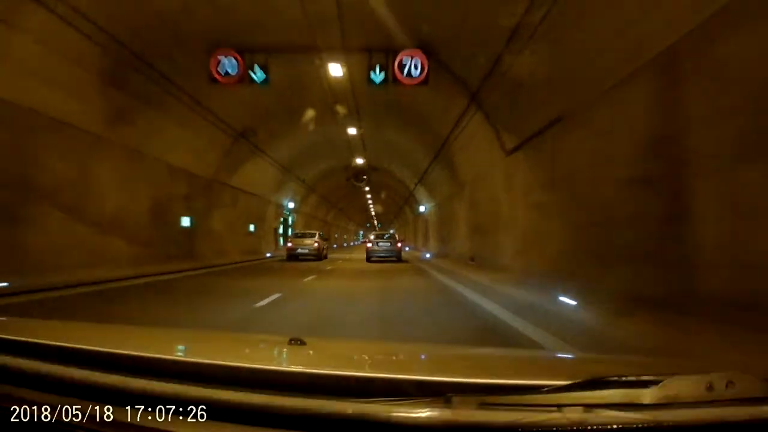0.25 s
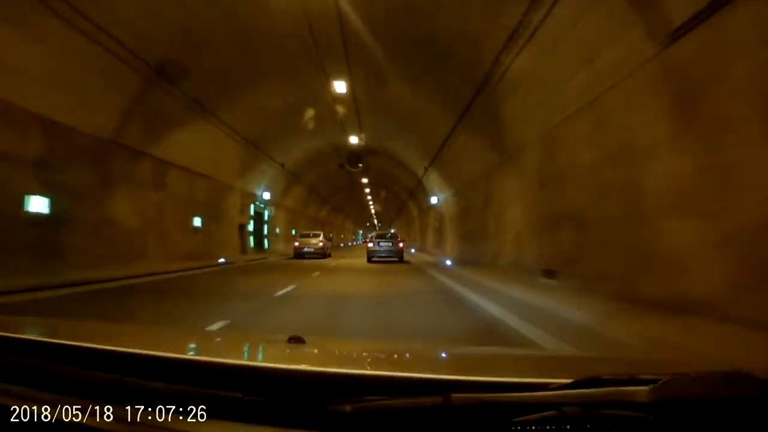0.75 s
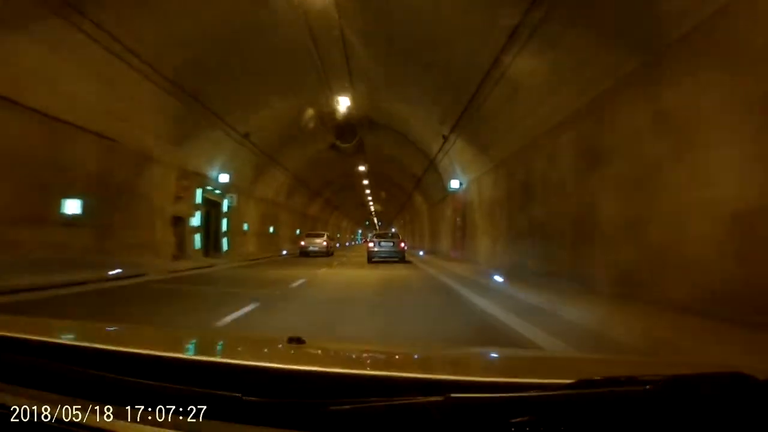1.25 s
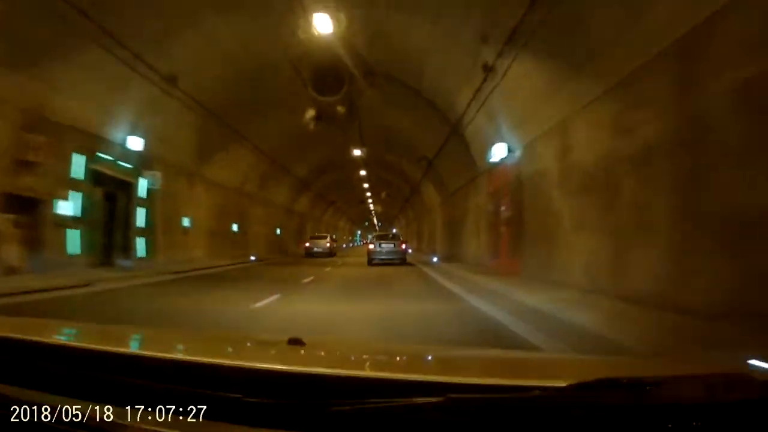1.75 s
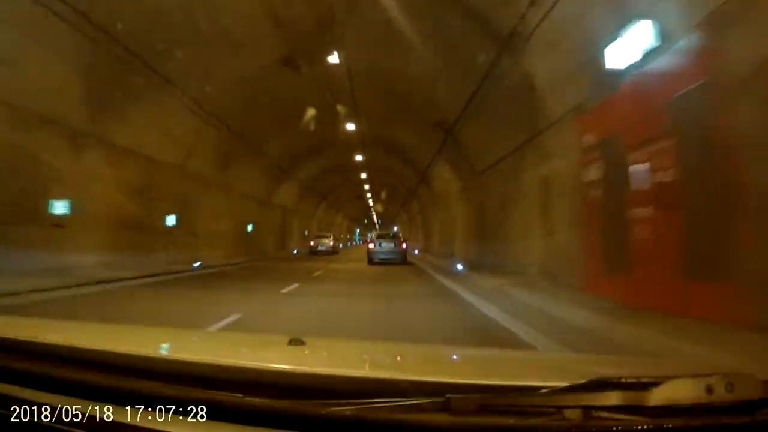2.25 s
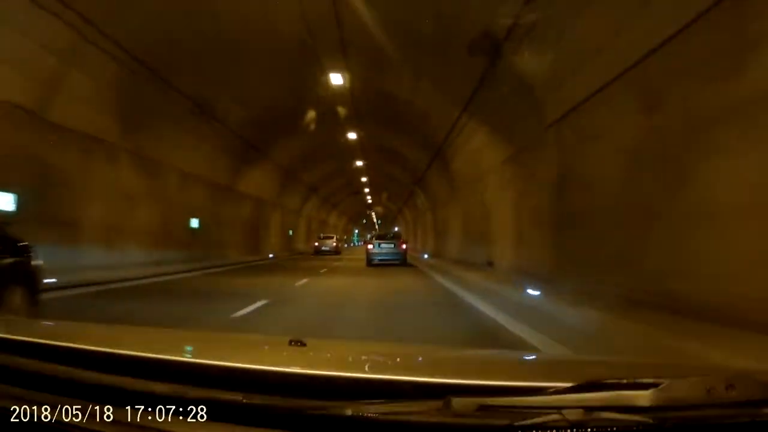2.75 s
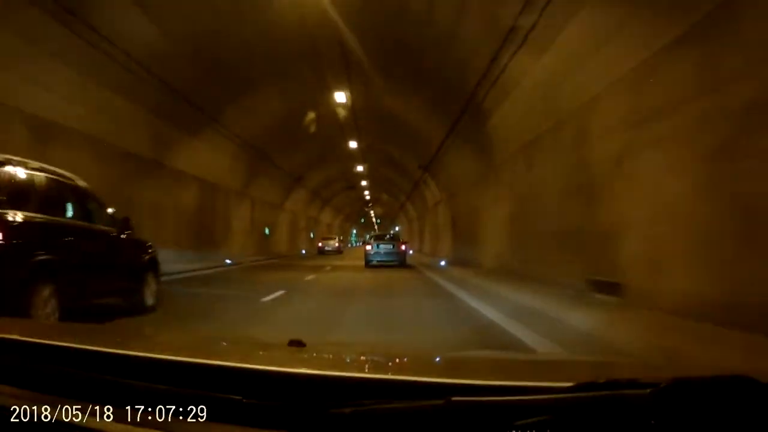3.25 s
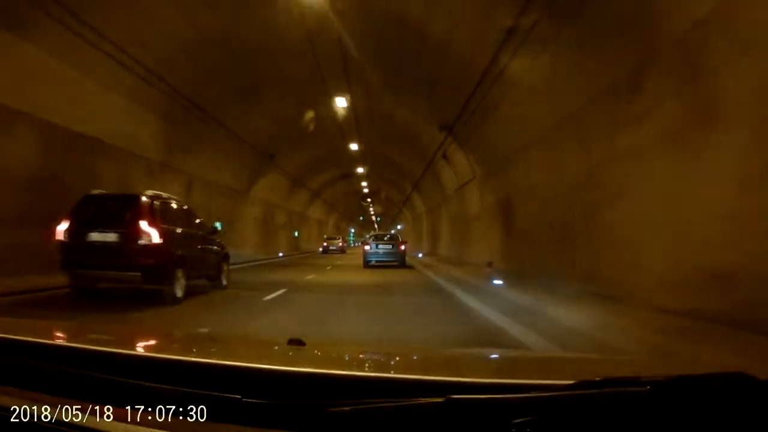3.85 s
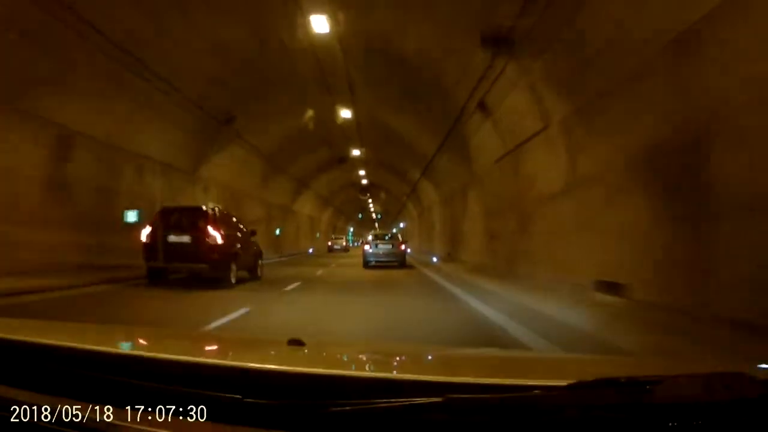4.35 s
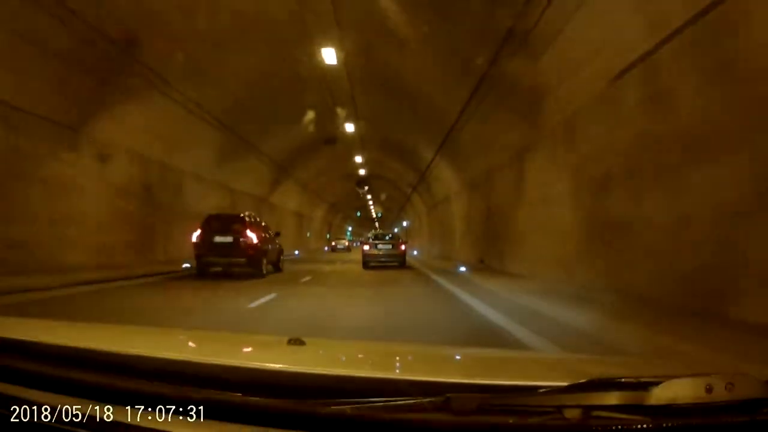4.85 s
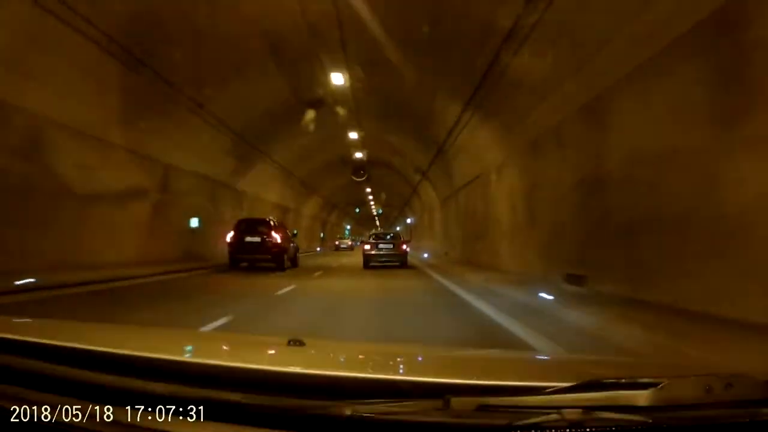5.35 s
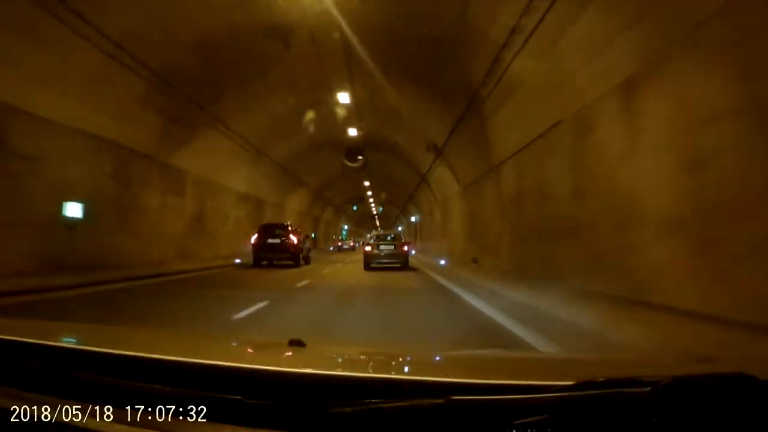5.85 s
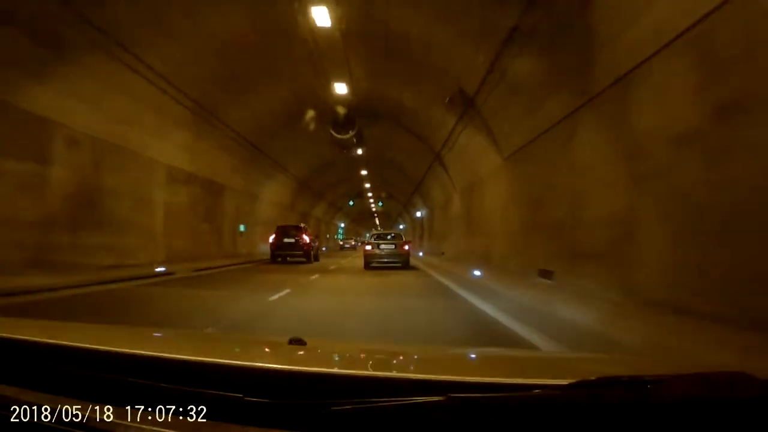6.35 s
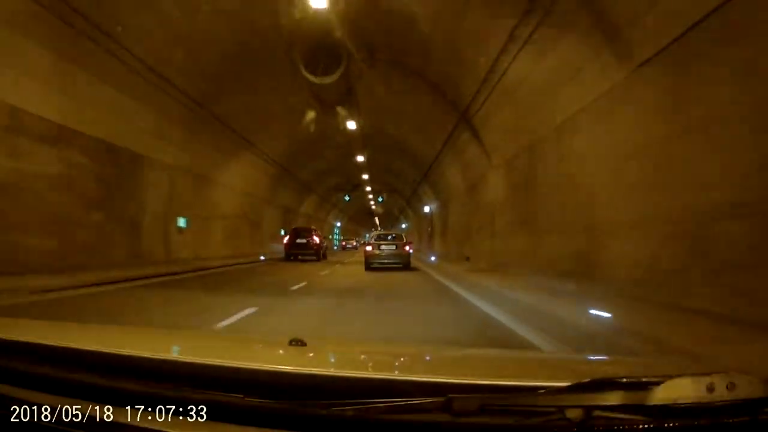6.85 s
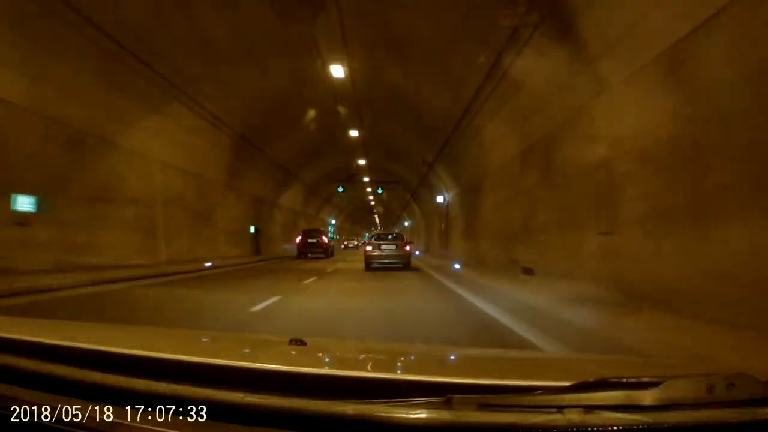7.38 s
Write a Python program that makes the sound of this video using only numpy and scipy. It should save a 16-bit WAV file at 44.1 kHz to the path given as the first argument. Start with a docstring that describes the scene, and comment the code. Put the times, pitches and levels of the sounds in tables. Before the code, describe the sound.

A car drives through a road tunnel, heard from a microphone behind the windscreen. A deep engine drone and a throbbing hum blend with steady road rumble, sinking very slightly in pitch. The tunnel adds an even, muffled tyre roar. Dull thuds come through the body, with a cluster about two seconds in and single bumps later. Midway, a faster car passes with a barely audible swish.

```python
"""Inside a car in a road tunnel, heard from a camera behind the windscreen as the car slows very slightly.
The firing engine drones and its valve gear whines faintly. A shaft and a belt-driven part hum, and
tyres that are not quite round throb. The road rumbles through the cabin and bumps thud through the body.
Outside, the tunnel walls blend the traffic's tyre noise into a roar, and a faster car swishes past."""
import sys
import numpy as np
from scipy.fft import rfft, irfft, next_fast_len
from scipy.io import wavfile
from scipy.ndimage import map_coordinates

SR = 44100
rng = np.random.default_rng(int(sys.argv[2]) if len(sys.argv) > 2 else 0)


def master_out(mix):
    """Clip the mix to full scale and print it as 16-bit PCM to the path in sys.argv[1]."""
    frames = np.transpose(np.atleast_2d(mix))
    ceiling = np.clip(frames, -1, 1)
    pcm = np.round(ceiling * 32767).astype(np.int16)
    wavfile.write(sys.argv[1], SR, pcm)


N = 336042

# Engine and shaft rock on their mounts, so their notes throb: random swings a second, and their depth.
THROB_RATE, BOOM_THROB_DB, SHAFT_THROB_DB = 8, 1.4, 1.7
# The engine's notes, the deep boom first: (multiple of the firing rate [x], level [dB])
ENGINE_NOTES = [(1, -30.6), (2, -36.9), (3, -37.8), (3.5, -47.3), (3.75, -41), (4.25, -45.5), (5.25, -46),
                (6, -48.6), (8.25, -53.5), (8.5, -52.5), (9.5, -53)]
# The boom grows as the engine works harder, then holds: (time [s], added level [dB])
ENGINE_LOAD = [(0, -6), (.8, -1.2), (2.2, 0), (3.6, 1.3), (4.2, -.5), (6, -.6), (7.1, .7), (7.62, 0)]
# The valve gear's whine passes from one note to the next as the engine slows:
# (time [s], level at 17 times the firing rate [dB], level at 18 times [dB])
VALVE_WHINE = [(0, -68, -70), (1.2, -60, -67), (2, -54, -65), (3.3, -52.5, -62), (4.2, -52.5, -54),
               (4.8, -61, -55.5), (6, -62, -51.3), (7.62, -72, -50)]


def engine(firing_hz):
    """The cylinders fire in a steady beat, making a boom and higher notes; the valve gear whines."""
    load_db, = curves(ENGINE_LOAD)
    boom_db = ENGINE_NOTES[0][1] + load_db + BOOM_THROB_DB * wobble(THROB_RATE)
    boom = amp(boom_db) * tone(firing_hz, waver_db=.3)
    overtones = sum(amp(db) * tone(multiple * firing_hz, waver_db=min(.4 * multiple, 2.2))
                    for multiple, db in ENGINE_NOTES[1:])
    whine = sum(amp(db) * tone(multiple * firing_hz, waver_db=1)
                for multiple, db in zip((17, 18), curves(VALVE_WHINE)))
    return boom + overtones + whine


SHAFT_RATIO, WHEEL_RATIO, BELT_RATIO = .8093, .141, 2.48  # cycles for each engine firing
# The shaft's hum dips, swells and fades, and a higher note takes over:
# (time [s], level at 3 times its turning rate [dB], level at 4 times [dB])
SHAFT_HUM = [(0, -40, -60), (.7, -34, -60), (1.8, -34.5, -60), (2.15, -40, -60), (2.75, -29.4, -60),
             (3.3, -31.5, -60), (4.3, -30, -50), (5.2, -33.5, -43), (5.8, -35, -40), (7, -37, -35.8),
             (7.62, -39, -36)]
# The shaft's other, steadier notes: (multiple of its turning rate [x], level [dB])
SHAFT_NOTES = [(2, -44.5), (5, -44.5), (6, -43), (8, -50.5)]
# A belt-driven part hums, pulsing against the shaft's note, then dies away: (time [s], level [dB])
BELT_HUM = [(0, -36.5), (1, -41), (3.4, -44), (4.5, -39.5), (5.5, -53)]
# The throb of tyres that are not quite round: (multiple of the wheel's turning rate [x], level [dB])
WHEEL_NOTES = [(2, -41.5), (3, -44.5), (4, -41), (9, -43)]


def turning_parts(firing_hz):
    """The car stays in one gear, so the notes of shaft, belt and wheels fall with the engine's."""
    shaft_hz = SHAFT_RATIO * firing_hz
    hum = sum(amp(db + SHAFT_THROB_DB * wobble(THROB_RATE)) * tone(multiple * shaft_hz, waver_db=.5)
              for multiple, db in zip((3, 4), curves(SHAFT_HUM)))
    overtones = sum(amp(db) * tone(multiple * shaft_hz, waver_db=2) for multiple, db in SHAFT_NOTES)
    belt_db, = curves(BELT_HUM)
    belt = amp(belt_db) * tone(BELT_RATIO * firing_hz, waver_db=1)
    wheels = sum(amp(db) * tone(multiple * WHEEL_RATIO * firing_hz, waver_db=1.5)
                 for multiple, db in WHEEL_NOTES)
    return hum + overtones + belt + wheels


SHAKE_DB, RUMBLE_DB, RING_DB = -31.5, -27.7, -33  # base levels on smooth road
TREAD_DB = -39.5  # tread hiss, compared with the tyre ring a rough patch adds
# Rough patches of road: (middle [s], length [s], body shake [dB], cabin rumble [dB], tyre ring [dB])
ROUGH_PATCHES = [(0.15, 0.2, -34, -31, -40), (0.34, 0.12, -45, -36, -30), (0.96, 0.12, -36, -30, -29),
                 (1.57, .16, -45, -45, -33.5), (1.92, .34, -30.5, -31.5, -45), (2.3, 0.45, -28, -35, -38),
                 (4.28, .18, -45, -42, -31), (4.54, 0.28, -33.5, -32, -60), (6.2, 0.25, -33, -34, -50),
                 (7.42, 0.25, -28, -37, -45)]
# The body shaking on its springs: (frequency [Hz], level [dB])
BODY_SHAKE = [(7, -24.5), (19, 0), (29, -1), (40, 3), (47, -.5), (56, 0), (65, -5), (76, -4.5), (88, -2.5),
              (125, -24), (1000, -120)]
# Where the cabin's air and panels ring: (pitch [Hz], width [Hz], level [dB])
CABIN_RUMBLE = [(102, 85, 1.5), (173, 65, -4.5), (216, 110, -3.5), (272.3, 74, -1.5), (458, 85, -9),
                (585, 81, -10.5)]
# Where the tyres ring: (pitch [Hz], width [Hz], level [dB])
TYRE_RING = [(346, 26, -1), (359, 20, -.5), (381, 20, -2), (404, 22, -8)]
# Coarse asphalt rings the tyres more, until the surface changes at a joint: (time [s], added level [dB])
ROAD_GRAIN = [(0, 1.6), (1.3, .3), (2.3, 1), (3.2, -.7), (4.35, .3), (4.45, -1.2), (7.62, -.6)]
# The tread hissing on coarse asphalt: (frequency [Hz], level [dB])
TREAD_HISS = [(1000, -4.5), (4800, -2), (7000, -8), (12000, -19.5)]


def road(firing_hz):
    """Asphalt shakes the body and rings cabin and tyres; rough patches add strength and a little hiss."""
    shake_power, rumble_power, ring_power = sum(amp(levels)[:, None] ** 2 * swell(middle, length)
                                                for middle, length, *levels in ROUGH_PATCHES)
    shake = np.sqrt(amp(SHAKE_DB) ** 2 + shake_power) * shaped_noise(BODY_SHAKE)
    rumble = np.sqrt(amp(RUMBLE_DB) ** 2 + rumble_power) * ringing_noise(CABIN_RUMBLE)
    grain_db, = curves(ROAD_GRAIN)
    ring = np.sqrt(amp(RING_DB + grain_db) ** 2 + ring_power) * ringing_noise(TYRE_RING)
    hiss = amp(TREAD_DB) * np.sqrt(ring_power) * shaped_noise(TREAD_HISS)
    speed_db = -.08 * (firing_hz - firing_hz.mean())  # a touch louder as the car slows
    return amp(speed_db) * (shake + rumble + ring + hiss)


# Bumps and joints in the road: (time [s], level [dB], pitch above which the tyre softens the blow [Hz])
ROAD_BUMPS = [(0.14, -21, 45), (2.12, -18, 60), (2.23, -20.5, 38), (2.36, -20.5, 38), (2.44, -18.5, 50),
              (4.40, -19.5, 150), (4.46, -19.5, 110), (5.23, -21, 45), (5.305, -22.5, 50), (7.45, -21, 45)]
# The notes a bump rings in the body and cabin air: (pitch [Hz], level [dB], time to fade by 60 dB [s])
THUD_NOTES = [(19, -5, .6), (39, 0, .45), (73, 0, .25), (89, -3, .25)]


def bumps(rise_s=.012):
    """Each bump rings the body's low notes; the softer the blow, the deeper the thud."""
    out = np.zeros(N)
    for start_s, db, cushion_hz in ROAD_BUMPS:
        start = round(start_s * SR)
        t = np.arange(min(SR, N - start)) / SR
        thud = np.zeros(len(t))
        for hz, note_db, fade_s in THUD_NOTES:
            softening = np.hypot(1, (hz / cushion_hz) ** 2)
            thud += amp(note_db - 60 * t / fade_s) * np.sin(2 * np.pi * hz * t) / softening
        out[start:start + len(t)] += amp(db) * thud * (1 - np.exp(-t / rise_s))
    return out


# The tunnel's tyre roar, heard through glass and door seals: (frequency [Hz], level [dB])
TUNNEL_ROAR = [(100, -9.5), (520, -5), (640, 0.5), (710, -1), (840, 0), (1170, -5), (1330, -11),
               (1530, -10), (1800, -15), (2250, -20.5), (2900, -21.5), (3110, -31), (4750, -36.5),
               (5250, -43.5), (12000, -74)]


def tunnel(firing_hz, base_db=-33.5, drift_db=.21):
    """The walls blend the tyre noise of all the cars into one even roar."""
    speed_db = .21 * (firing_hz - firing_hz.mean())  # a little quieter as the car slows
    return amp(base_db + speed_db + drift_db * wobble(7)) * shaped_noise(TUNNEL_ROAR)


# The faster car's tyres, heard through the side window: (frequency [Hz], level [dB])
PASSING_SWISH = [(400, -13), (700, -0.5), (1100, 1.5), (1900, -16), (3800, -22), (6000, -46)]


def passing_car(nearest_s=3.46, length_s=1.4, peak_db=-50):
    """Its tyres grow louder alongside, then sink into the roar as it pulls ahead."""
    return amp(peak_db) * np.sqrt(swell(nearest_s, length_s)) * shaped_noise(PASSING_SWISH)


def amp(db):
    """Turn decibels into a number to multiply a sound by."""
    return 10 ** (np.asarray(db) / 20)


def unit(x):
    """Scale a sound to an average power of 1."""
    return x / np.sqrt(np.mean(x ** 2) + 1e-20)


def curves(rows):
    """Join a table's points with straight lines: one curve for each column after the time."""
    times, *columns = np.transpose(rows)
    return [np.interp(np.arange(N) / SR, times, column) for column in columns]


def wobble(rate):
    """A smooth curve through `rate` random points a second."""
    points = rng.standard_normal(int(N * rate / SR) + 4)
    return map_coordinates(points, [np.arange(N) * rate / SR])


def swell(middle, length):
    """A smooth hill of height 1, `length` seconds wide halfway up."""
    return np.exp2(-(2 * (np.arange(N) / SR - middle) / length) ** 2)


def tone(hz, waver_db):
    """A pure note that follows a pitch curve while its loudness wavers slowly."""
    phase = 2 * np.pi * (np.cumsum(hz) / SR + rng.random())
    return np.sqrt(2) * np.sin(phase) * amp(waver_db * wobble(2.97))


def filtered(x, response):
    """Turn each frequency of a sound up or down by response(hz)."""
    size = next_fast_len(N + SR // 2)
    return irfft(rfft(x, size) * response(np.fft.rfftfreq(size, 1 / SR)), size)[:N]


def shaped_noise(shape):
    """Noise of power 1; the table sets only the balance of low and high frequencies."""
    points_hz, db = np.transpose(shape)
    noise = rng.standard_normal(N)
    return unit(filtered(noise, lambda hz: amp(np.interp(np.log(hz + 1), np.log(points_hz), db))))


def ringing_noise(bands, muffle_hz=680):
    """Noise of power 1 that rings around the listed pitches and is muffled above them."""
    def response(hz):
        power = 0
        for pitch, width, db in bands:
            peak = (hz * width) ** 2 / ((pitch ** 2 - hz ** 2) ** 2 + (hz * width) ** 2)
            power += (amp(db) * peak) ** 2
        return np.sqrt(power / (1 + (hz / muffle_hz) ** 8))
    return unit(filtered(rng.standard_normal(N), response))


# The engine slowing very slightly: (time [s], firing rate [Hz])
ENGINE_SPEED = [(0.0, 72.0), (2.0, 69.77), (4.0, 68.62), (6.0, 67.42), (7.62, 66.63)]


def scene():
    """All the sounds meet at one microphone in the cabin."""
    firing_hz, = curves(ENGINE_SPEED)
    own_car = engine(firing_hz) + turning_parts(firing_hz) + road(firing_hz) + bumps()
    return (own_car + tunnel(firing_hz) + passing_car())[None]


# The microphone's own hiss: (frequency [Hz], level [dB])
MIC_HISS = [(1000, -3), (6500, -1.5), (8500, -1.5), (10300, -1.5), (15000, -5.5)]


def record(dry, hiss_db=-68.5, top_hz=15600, fade_s=.003):
    """The camera adds a faint hiss and loses the highest treble; both ends fade quickly."""
    samples_from_edge = np.minimum(np.arange(N), np.arange(N)[::-1])
    fade = np.sin(np.pi / 2 * np.clip(samples_from_edge / (fade_s * SR), 0, 1))
    sound = dry[0] + amp(hiss_db) * shaped_noise(MIC_HISS)
    return filtered(fade * sound, lambda hz: hz < top_hz)[None]


dry = scene()
out = record(dry)
master_out(out)
```